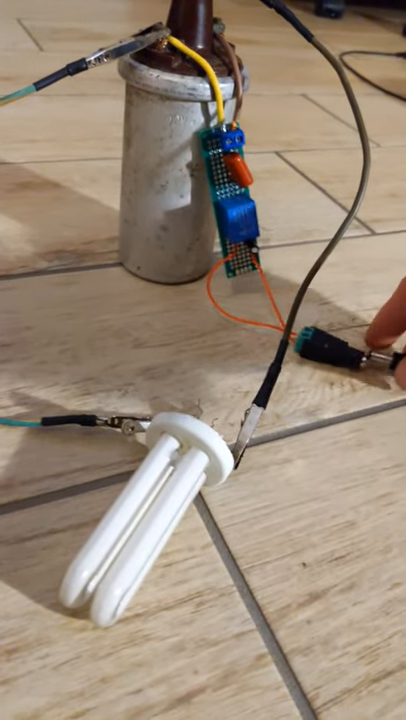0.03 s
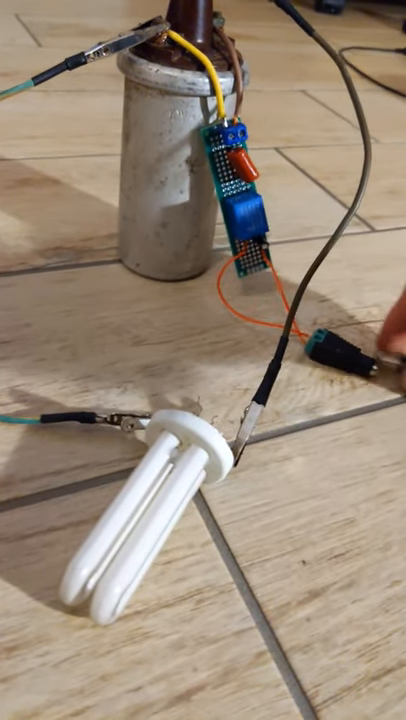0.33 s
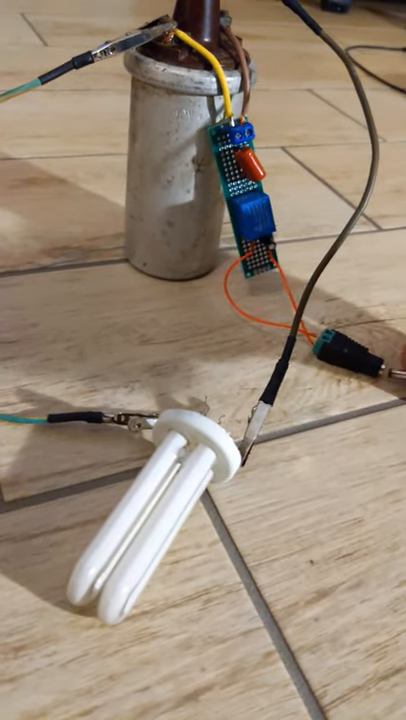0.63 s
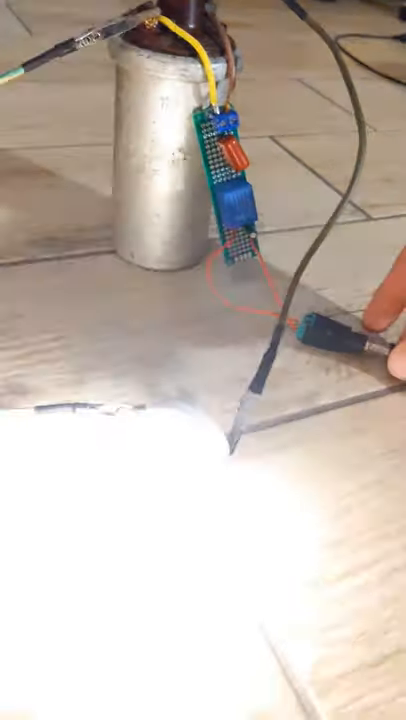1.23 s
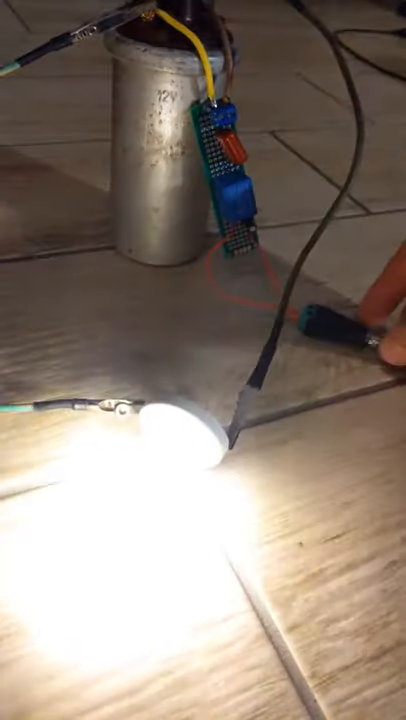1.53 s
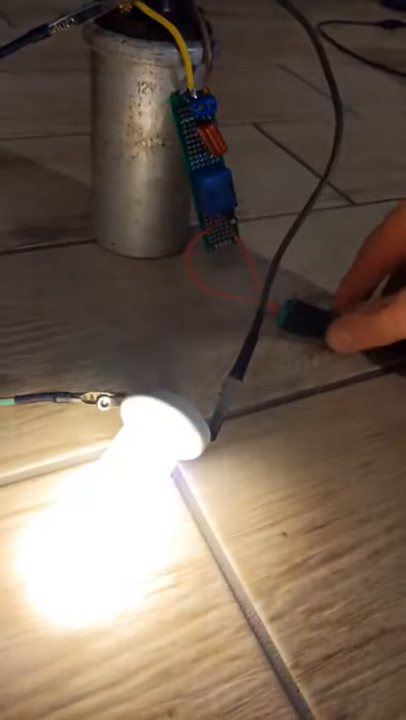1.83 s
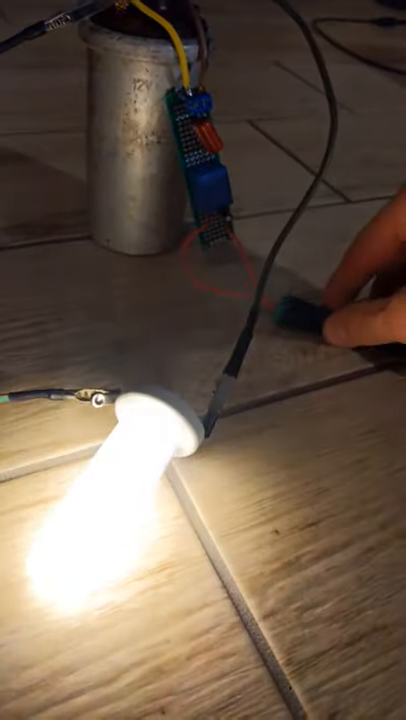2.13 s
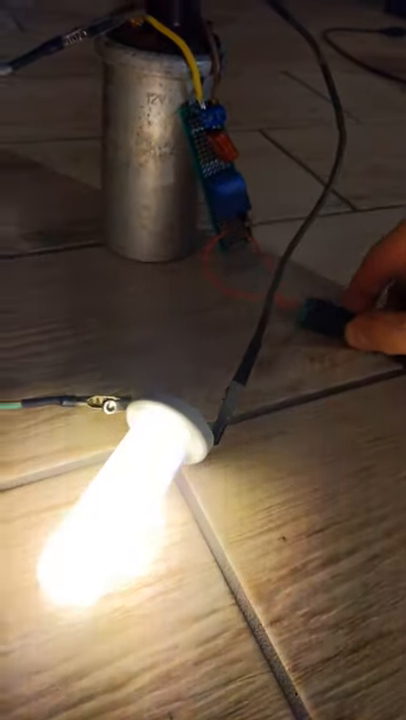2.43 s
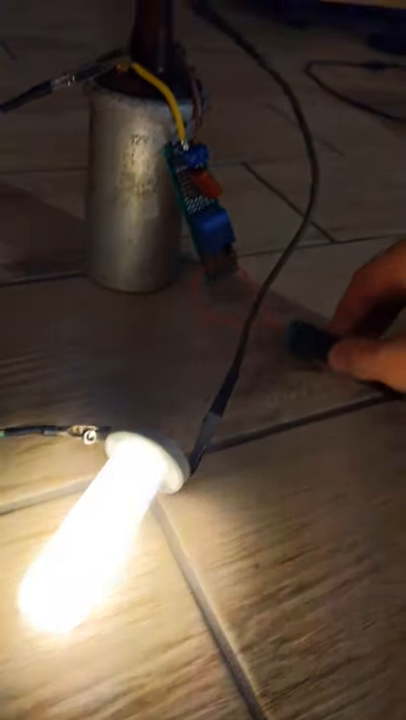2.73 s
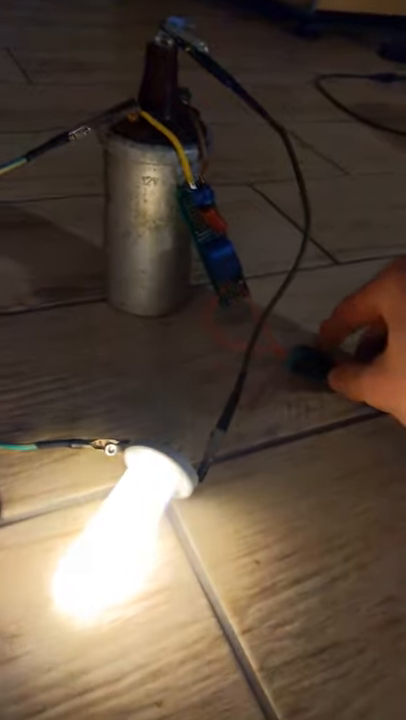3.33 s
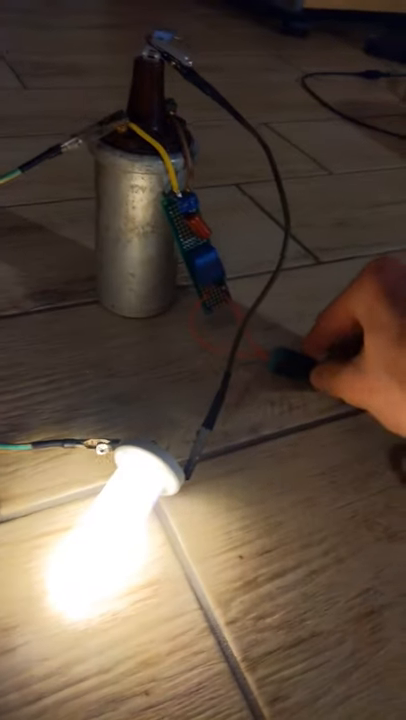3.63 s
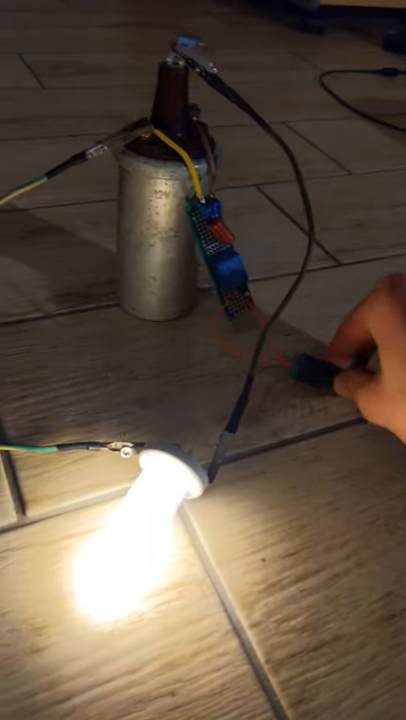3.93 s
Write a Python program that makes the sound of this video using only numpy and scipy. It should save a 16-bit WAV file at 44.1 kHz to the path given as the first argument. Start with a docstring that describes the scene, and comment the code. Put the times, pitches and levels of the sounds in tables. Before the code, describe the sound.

A harsh, bright electrical buzz comes from an ignition coil lighting a lamp. It starts suddenly after faint clicks of a power plug being handled, then runs on indoors, easing slightly as the microphone draws back.

```python
"""An ignition coil, switched by a timer circuit to light a lamp, gives a harsh, bright buzz.
Each cycle is two impulses, a soft tick as the coil charges and a sharp snap as it fires, and both
excite the resonances of its metal can. The microphone slowly draws back, so the colour and the
reflections off the tiled floor shift. Before the buzz starts, a hand fiddles with a power plug.
A faint room hum lies underneath."""
import sys
import numpy as np
from scipy import signal
from scipy.fft import rfft, irfft, next_fast_len
from scipy.io import wavfile
from scipy.ndimage import uniform_filter1d, map_coordinates

SR = 44100
rng = np.random.default_rng(int(sys.argv[2]) if len(sys.argv) > 2 else 0)


def waveform_to_disk(signal):
    """Save audio, clipped to [-1, 1], as 16-bit WAV at the path in sys.argv[1]."""
    frames = np.transpose(np.atleast_2d(signal))
    scaled = np.clip(frames, -1, 1) * 32767
    samples = np.round(scaled).astype(np.int16)
    wavfile.write(sys.argv[1], SR, samples)


N = 176400
ON_S = 1.1896  # the coil starts
CRACK_S = 0.0004  # a brief crack leads each snap by this much
ECHO_EDGE_HZ = 1790  # reflections lie mostly above this


def amp(db):
    """Amplitude ratio of a level in decibels."""
    return 10 ** (np.asarray(db) / 20)


def along(points, hz):
    """Interpolation of (f/Hz, value) points on a logarithmic frequency axis."""
    f, values = np.transpose(points)
    return np.interp(np.log(hz + 1), np.log(f + 1), values)


def curve(points, t):
    """Linear interpolation of (t/s, value) points."""
    return np.interp(t, *np.transpose(points))


def wobble(rate, t):
    """Random modulation: a spline through `rate` Gaussian knots a second."""
    return map_coordinates(rng.standard_normal(1024), [t * rate], mode="wrap")


def swell(t, middle, length):
    """Raised-cosine envelope."""
    return np.cos(np.pi * np.clip((t - middle) / length, -.5, .5)) ** 2


def coloured(x, db_of, causal=False):
    """Filtering by a response in dB; the causal, minimum-phase form rings only after a blow."""
    size = 2 * next_fast_len(len(x) // 2 + 8192)
    gain = amp(db_of(np.fft.rfftfreq(size, 1 / SR)))
    if causal:
        cepstrum = irfft(np.log(gain + 1e-7))
        cepstrum[1:size // 2] *= 2
        cepstrum[size // 2 + 1:] = 0
        gain = np.exp(rfft(cepstrum))
    return irfft(rfft(x, size) * gain, size)[:len(x)]


def high_pass(x, edge_hz):
    """Second-order attenuation below the edge frequency."""
    return coloured(x, lambda hz: -10 * np.log10(1 + (edge_hz / (hz + 100)) ** 4), causal=True)


def noise(db_of):
    """Spectrally shaped Gaussian noise of rms 1."""
    x = coloured(rng.standard_normal(N), db_of)
    return x / np.sqrt(np.mean(x ** 2) + 1e-20)


def pulses(times, sizes):
    """Band-limited impulses: windowed sincs placed between samples."""
    at = times[:, None] * SR
    index = np.floor(at).astype(int) + np.arange(-7, 9)
    taps = np.sinc(index - at) * np.cos(np.pi * (index - at) / 16) ** 2
    return np.bincount(index.ravel(), (sizes[:, None] * taps).ravel(), N)[:N]


def scatter(envelope):
    """Diffuse response: dense random arrivals of energy 1 under an envelope."""
    response = rng.standard_normal(len(envelope)) * envelope
    return response / np.linalg.norm(response)


# spectrum of the room air: f/Hz, relative level/dB
AIR_SPECTRUM = [(30, -21), (60, -10.5), (100, -15), (190, -18), (600, -25), (1000, -27.5), (3000, -32),
                (7500, -34.5), (10000, -39.5), (15500, -45)]
# spectrum of the soft rush under the buzz: f/Hz, relative level/dB
RUSH_SPECTRUM = [(25, -8), (60, -4.5), (150, -5.5), (400, -10), (800, -9), (1400, -13.5), (4000, -5),
                 (15000, -20)]

def room(t):
    """Ambient noise and a low pure tone; once the coil runs, this hum sinks and a soft rush joins."""
    on = np.clip((t - ON_S) / 0.013, 0, 1)
    hum_hz = 43.7
    hum_rms = amp(-67.5 - 10.5 * on + 0.65 * wobble(9, t))
    hum = hum_rms * np.sqrt(2) * np.sin(2 * np.pi * hum_hz * t)
    rush = on * amp(-60 + 0.92 * wobble(8.3, t)) * noise(lambda hz: along(RUSH_SPECTRUM, hz))
    air = amp(-71.5) * noise(lambda hz: along(AIR_SPECTRUM, hz))
    return hum + rush + air


# clicks of the plug: t/s, level/dB, tilt/(dB per octave)
PLUG_CLICKS = [(.293, -65.5, 1), (0.384, -61, -3), (.544, -67, -2), (.864, -71, 9), (0.869, -63.5, -1.5),
               (.959, -72, 10), (1.104, -64, 5), (1.16, -71, 0)]
# spectrum of a click before its tilt: f/Hz, relative level/dB
CLICK_SPECTRUM = [(200, -11), (900, 2), (3000, 5), (4500, -3), (6800, 6), (9000, -2), (15000, -9)]

def plug_clicks(t):
    """Impact: each noise burst decays exponentially and leaves a weak reverberant tail."""
    out = np.zeros(N)
    for start, db, tilt in PLUG_CLICKS:
        age = np.abs(t - start)
        decay = amp(-60 * age / 0.016) + amp(-16 - 60 * age / ROOM_T60_S)
        burst = noise(lambda hz: along(CLICK_SPECTRUM, hz) + tilt * np.log2(hz + 1))
        out += amp(db) * decay * (t >= start) * burst
    return out


# rubs and bumps of the hands: centre t/s, half-amplitude duration/s, level/dB, upper edge f/Hz
HAND_RUBS = [(0.31, 0.041, -70.5, 900), (.44, 0.13, -75.5, 1900), (2.74, 0.053, -66, 330),
             (3.045, 0.017, -58, 286), (3.335, 0.059, -65.5, 220)]

def hand_rubs(t):
    """Friction and soft contact: dull swells of low-passed noise."""
    out = np.zeros(N)
    for middle, length, db, edge_hz in HAND_RUBS:
        rub = noise(lambda hz: -10 * np.log10(1 + (hz / edge_hz) ** 6))
        out += amp(db) * swell(t, middle, 2 * length) * rub
    return out


def plug_squeak(t, hz=680):
    """Sliding friction: the plug goes in with one wavering tone."""
    phase = 2 * np.pi * hz * t + 0.45 * wobble(40.3, t)
    return amp(-69.5) * swell(t, middle=1.028, length=0.19) * np.sin(phase)


# switching rate of the timer: t/s, f/Hz
SWITCHING_RATE = [(1.19, 125.03), (1.47, 124.27), (1.67, 125.1), (1.75, 123.57), (1.79, 125.09),
                  (1.91, 124.57), (1.95, 124.83), (2.23, 124.87), (2.27, 124.53), (2.55, 124.79),
                  (2.75, 124.29), (3.03, 124.83), (3.07, 124.24), (3.43, 124.61), (3.57, 124.3),
                  (3.62, 124.95), (3.68, 124.15), (3.99, 124.59)]

def firing_times(t, jitter_s=6e-6, wander_s=2.4e-5):
    """Phase is the integral of frequency: the coil fires once a cycle, slightly unsteadily."""
    running = t >= ON_S
    cycles = np.cumsum(curve(SWITCHING_RATE, t) * running) / SR
    fire = np.interp(np.arange(int(cycles[-1]) + 1), cycles[running], t[running])
    return fire + jitter_s * rng.standard_normal(len(fire)) + wander_s * wobble(35, fire)


# retreat of the microphone: t/s, position (0 close, 1 midway, 2 and above drawn back)
MIC_POSITION = [(1.2, 0.094), (1.62, 0.31), (2.1, 0.94), (2.6, 1.26), (3.1, 1.8), (4, 2.7)]

def moving_microphone(x, path, smoothing_hz, count):
    """Time-varying convolution: x cross-fades through successive responses, each evened in colour."""
    span_s = N / SR - ON_S
    progress = np.clip((np.arange(N) / SR - ON_S) / span_s, 0, 1) * (count - 1)
    out = np.zeros(N)
    for k in range(count):
        response = path(curve(MIC_POSITION, ON_S + span_s * k / (count - 1)))
        size = 2 * len(response)
        bins = max(1, int(smoothing_hz * size / SR))
        power = np.abs(uniform_filter1d(np.abs(rfft(response, size)) ** 2, bins)) + 1e-9
        f = np.fft.rfftfreq(size, 1 / SR)
        evened = coloured(response, lambda hz: -10 * np.log10(np.interp(hz, f, power)), causal=True)
        fade = np.clip(1 - np.abs(progress - k), 0, 1)
        out += signal.fftconvolve(x * fade, evened)[:N]
    return out


def dispersed(x, lag_s=0.0006963, slow_hz=3870, fast_hz=12580):
    """Dispersion: low tones travel slower in the can wall, so a snap becomes a tiny falling chirp."""
    hz = np.fft.rfftfreq(2 * len(x), 1 / SR)
    group_delay = lag_s * np.clip((fast_hz - hz) / (fast_hz - slow_hz), 0, 1)
    phase = -2 * np.pi * np.cumsum(group_delay) * hz[1]
    return irfft(rfft(x, 2 * len(x)) * np.exp(1j * phase))[:len(x)]


def snap_path(position):
    """Multipath propagation: with distance the direct snap weakens against its reflections."""
    t = np.arange(SR // 4) / SR - CRACK_S
    near_s, floor_s, near_t60_s = 0.0002, 0.0013, 0.017
    crack = amp(-6.5) * scatter(swell(t, -CRACK_S / 2, CRACK_S))
    off_can_and_lamp = amp(-6.5) * scatter((t > near_s) * amp(-60 * np.abs(t) / near_t60_s))
    off_tiles = amp(-2.5) * scatter(swell(t, floor_s, length=0.0026))
    reverberation = amp(-12.5) * scatter((t > floor_s) * amp(-60 * t / ROOM_T60_S))
    response = high_pass(crack + off_can_and_lamp + off_tiles + reverberation, ECHO_EDGE_HZ)
    response[np.argmin(np.abs(t))] += amp(-3 * position)  # the direct snap
    return dispersed(response)


def sparks(t, fire, t60_s=0.008):
    """Electrical discharge: a decaying burst of fresh noise at each firing, of mean energy 1."""
    starts = fire - CRACK_S
    age = t - starts[np.clip(np.searchsorted(starts, t) - 1, 0, None)]
    bursts = (age > 0) * amp(-60 * np.abs(age) / t60_s) * rng.standard_normal(N)
    return bursts * np.sqrt(len(fire) / np.sum(bursts ** 2))


# lag of the floor echo behind the snap: t/s, delay/s
ECHO_DELAY = [(1.2, 0.0023), (2.5, 0.0024), (3.0, 0.0018), (3.5, .0018), (4, 0.0016)]

def floor_echo(fire, sizes):
    """Specular reflection off the tiles: the lag shrinks as the microphone draws back."""
    echoes = dispersed(pulses(fire + curve(ECHO_DELAY, fire), sizes))
    return amp(-15) * high_pass(echoes, ECHO_EDGE_HZ)


# strength of the charging tick before its colouring: t/s, level/dB re the snap
TICK_LEVEL = [(1.2, -2.5), (1.7, -5.5), (2, 2), (2.4, -0.5), (2.8, -8), (3.2, -1), (4, -7)]
# colour of the tick: f/Hz, gain/dB
TICK_SPECTRUM = [(200, -62), (1500, -14), (3000, -5), (5500, -5), (8700, -1), (11000, -15), (15000, -9.5)]

def charging_ticks(fire, lead_s=0.0015, ring_s=0.002):
    """Transient excitation: the core chatters as current starts to flow, just ahead of the firing."""
    sizes = amp(curve(TICK_LEVEL, fire) + 1.2 * rng.standard_normal(len(fire)))
    slip_s = 6e-6 * amp(15 * wobble(32, fire))  # the timing slips in short fits
    times = fire - lead_s + slip_s * rng.standard_normal(len(fire))
    age = np.arange(SR // 16) / SR
    chatter = 1 / (1 + (age / ring_s) ** 4)
    impulses = pulses(times[1:], sizes[1:])
    ticks = moving_microphone(impulses, lambda _: scatter(chatter), smoothing_hz=364, count=5)
    return coloured(ticks, lambda hz: along(TICK_SPECTRUM, hz), causal=True)


# sputters before their colouring: centre t/s, duration/s, level/dB re the snap
SPUTTER_SPELLS = [(1.496, 0.1, -17), (1.65, 0.08, -17), (1.75, 0.09, -14.5), (2.0, .08, -18),
                  (2.53, 0.09, -16.5), (2.939, 0.06, -14), (3.08, 0.12, -15.5)]
# colour of a sputter: f/Hz, gain/dB
SPUTTER_SPECTRUM = [(200, -38), (2500, -35), (5000, 13.5), (6800, 15), (9000, -7), (15000, -9)]

def sputters(t, fire):
    """Amplitude modulation: brief swells of spark noise turn the discharge coarser."""
    envelope = sum(amp(db) * swell(t, middle, length) for middle, length, db in SPUTTER_SPELLS)
    return envelope * coloured(sparks(t, fire), lambda hz: along(SPUTTER_SPECTRUM, hz), causal=True)


# broad colour of the buzz: f/Hz, gain/dB close, gain/dB midway, gain/dB drawn back
BUZZ_SPECTRUM = [(98, -31, -34, -32.5), (257, -28, -24.5, -28.5), (580, -30, -31, -33),
                 (880, -36, -36, -32), (1500, -47.5, -42.5, -27), (2120, -36, -30, -26.5),
                 (3270, -22.5, -20, -23), (4600, -18.5, -20, -17.5), (5210, -4.5, -5, -7),
                 (6710, -5, -7.5, -1), (9040, -3.5, 2, 3.5), (9980, 1.5, -1, -2), (11740, -6, -1, -4),
                 (13900, -0.5, -4.5, -2), (14700, -4, -5, -2.5), (15450, -2, -1.5, -7)]
# resonances of can and lamp: f/Hz, width/Hz, gain/dB close, gain/dB midway, gain/dB drawn back
CAN_MODES = [(468, 136, 7.5, 10, 4.5), (1175, 136, 15.5, 9, 11), (1826, 270, 10.5, 11, -4.5),
             (2805, 180, 15.5, 7, 1.5), (3656, 270, 3, 6, -6), (4290, 425, 9.5, 10, 9),
             (5640, 290, 6.5, 5, -1), (6070, 310, -2.5, 2.5, 6), (6415, 143, 4.5, 7, 4.5),
             (7600, 590, 5, 5.5, -6.5), (8020, 167, 14, 7, 5.5), (8750, 510, 10.5, 8.5, 0.5),
             (9580, 720, 1.5, 6.5, 4.5), (10640, 460, 7, 9.5, 4.5), (11124, 380, 14, 9, 2),
             (13030, 300, 5, 2.5, 3.5), (13580, 240, 6.5, 7, -1.5), (14300, 330, 0, 10, 2)]

def can_db(hz, place):
    """Resonance: modal bands on a broad spectrum, heard close (0), midway (1) or drawn back (2)."""
    broad = along([(f, gains[place]) for f, *gains in BUZZ_SPECTRUM], hz)
    modes = sum(gains[place] / (1 + (2 * (hz - f) / width) ** 4) for f, width, *gains in CAN_MODES)
    return broad + modes


# rms of the buzz: t/s, level/dB
BUZZ_LEVEL = [(1.2, -24.5), (1.38, -25), (1.53, -24.5), (1.7, -25.5), (1.85, -24.5), (2.15, -24.5),
              (2.45, -25), (2.65, -25.5), (3.05, -26.5), (3.3, -28), (3.6, -27.5), (4, -28)]

def coil(t):
    """Source and filter: periodic snaps, ticks and discharge noise drive the resonances of the can."""
    fire = firing_times(t)
    sizes = amp(0.3 * rng.standard_normal(len(fire)))
    snaps = moving_microphone(pulses(fire - CRACK_S, sizes), snap_path, smoothing_hz=133, count=10)
    fizz = amp(-11) * high_pass(sparks(t, fire), edge_hz=6000)
    drive = snaps + fizz + floor_echo(fire, sizes) + charging_ticks(fire) + sputters(t, fire)
    position = np.clip(curve(MIC_POSITION, t), 0, 2)
    buzz = np.zeros(N)
    for place in range(3):
        fade = np.clip(1 - np.abs(position - place), 0, 1)
        buzz += fade * coloured(drive, lambda hz: can_db(hz, place), causal=True)
    running, window = t >= ON_S, 7080  # mean power over 0.16 s of running time
    power = uniform_filter1d(buzz ** 2, window) / (uniform_filter1d(running * 1., window) + 0.00092)
    rms = np.sqrt(np.abs(np.interp(t, t[running], power[running])))
    return buzz / rms * amp(curve(BUZZ_LEVEL, t))


def scene():
    """Superposition: coil, room, plug and hands add in one channel."""
    t = np.arange(N) / SR
    return (coil(t) + room(t) + plug_clicks(t) + hand_rubs(t) + plug_squeak(t))[None]


def record(dry):
    """Band limiting: the treble falls steeply, by 70 dB, above 15750 Hz."""
    return np.array([coloured(x, lambda hz: -70 * np.clip((hz - 15750) / 400, 0, 1) ** 2) for x in dry])


ROOM_T60_S = 0.33  # reverberation time, shared by the clicks and the snaps

dry = scene()
out = record(dry)
waveform_to_disk(out)
```